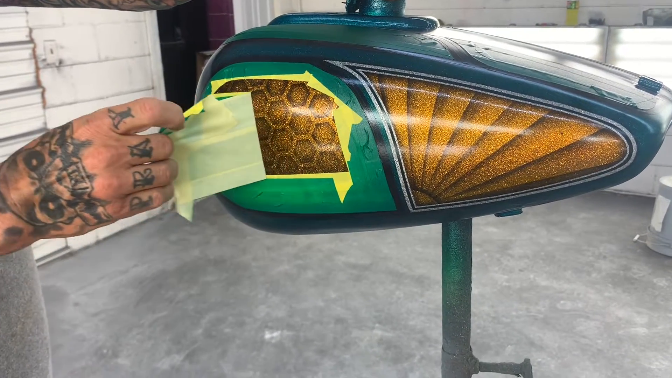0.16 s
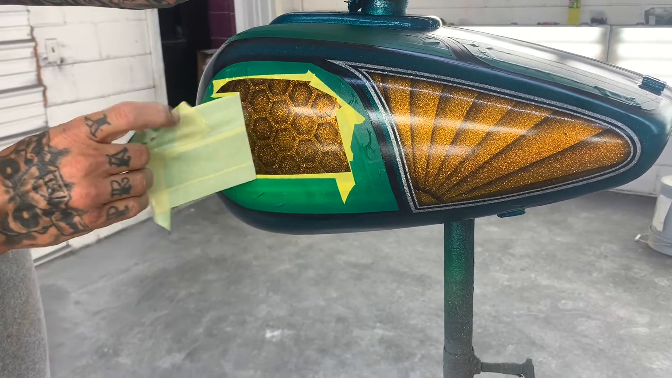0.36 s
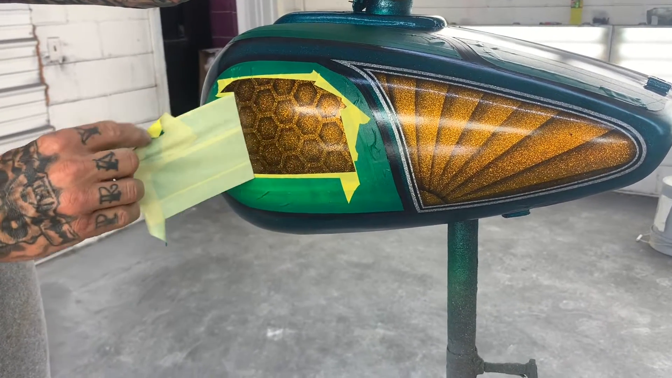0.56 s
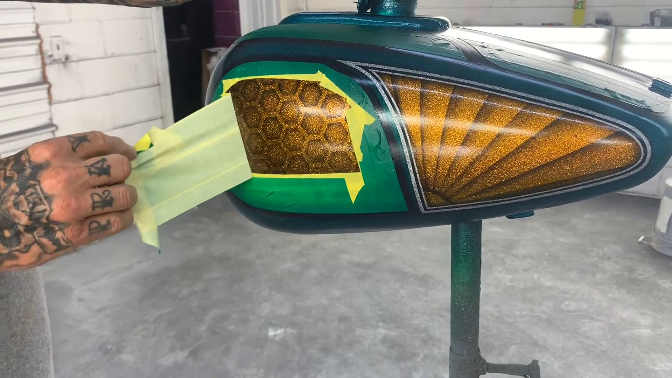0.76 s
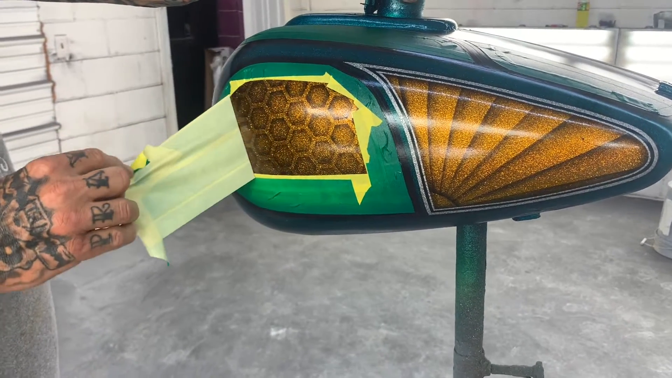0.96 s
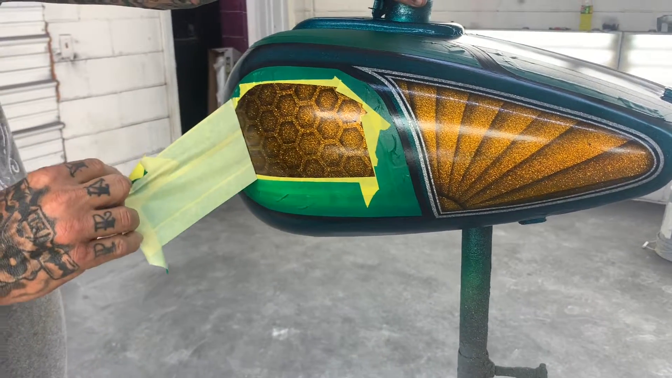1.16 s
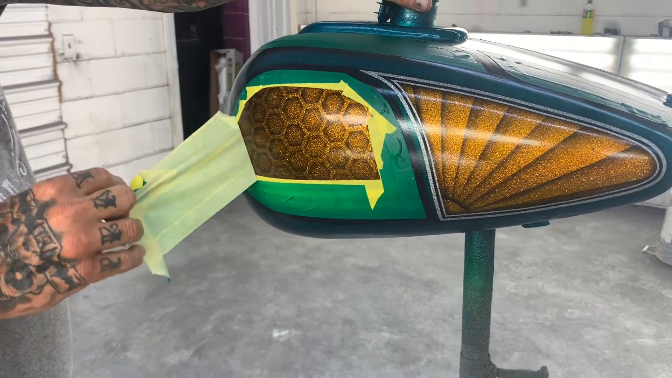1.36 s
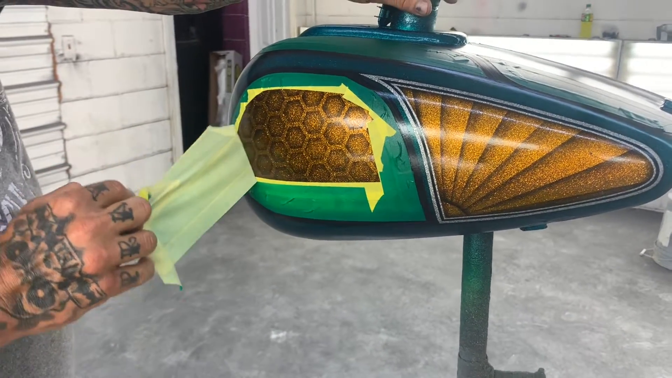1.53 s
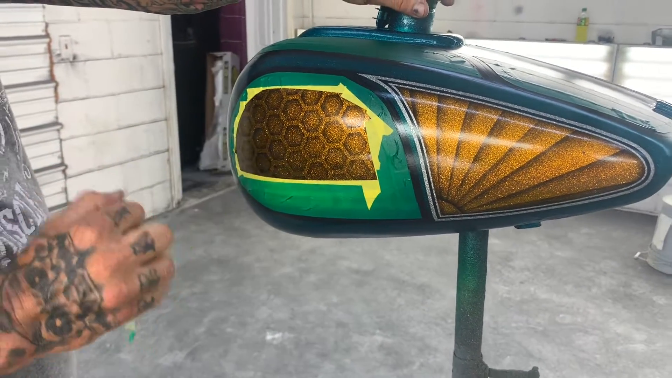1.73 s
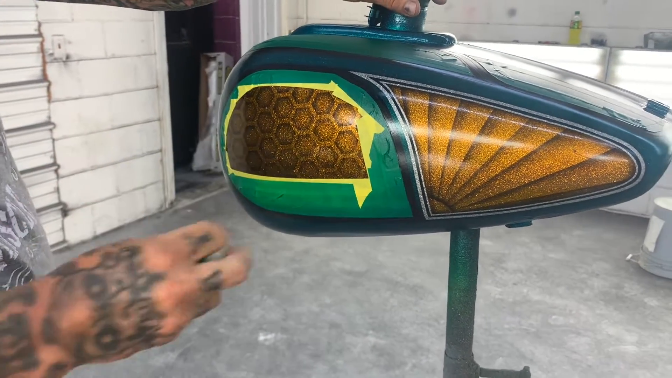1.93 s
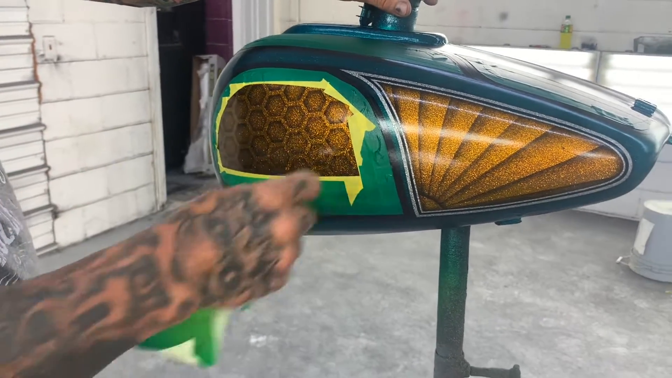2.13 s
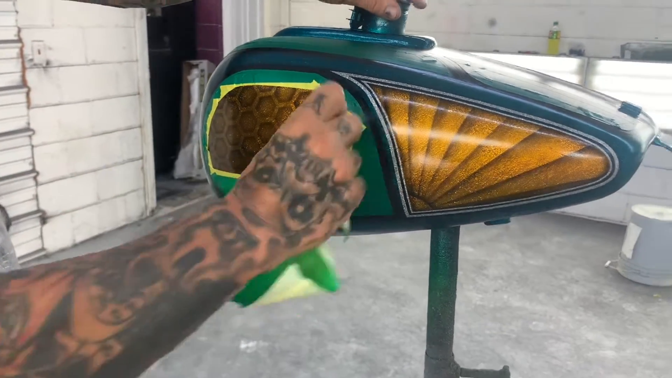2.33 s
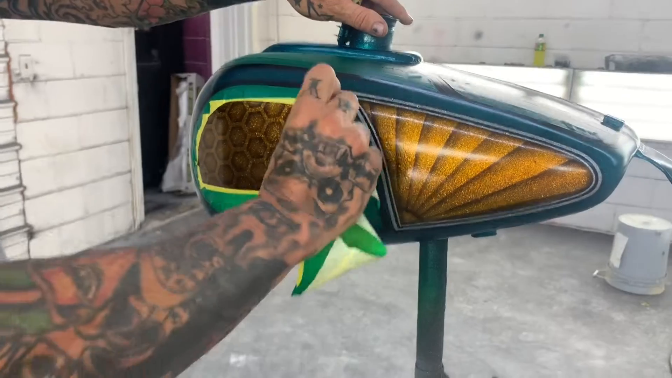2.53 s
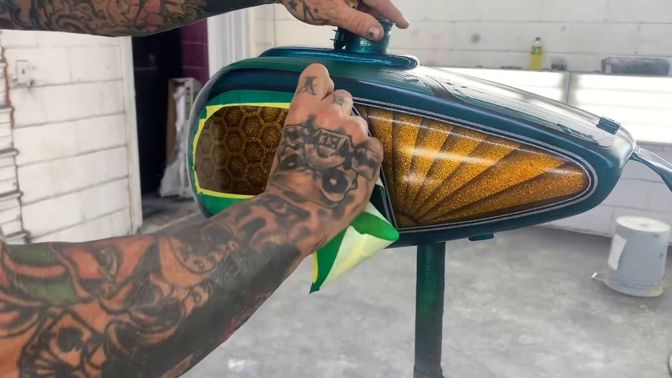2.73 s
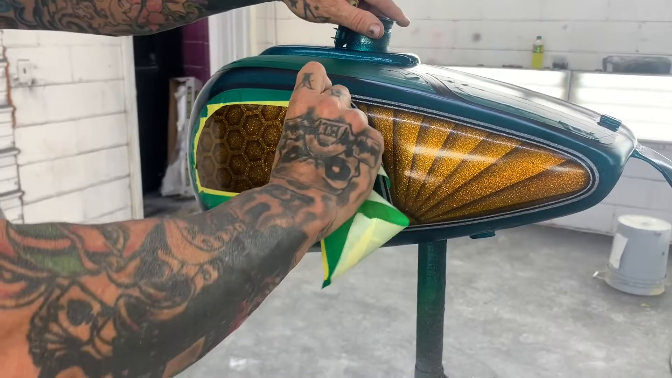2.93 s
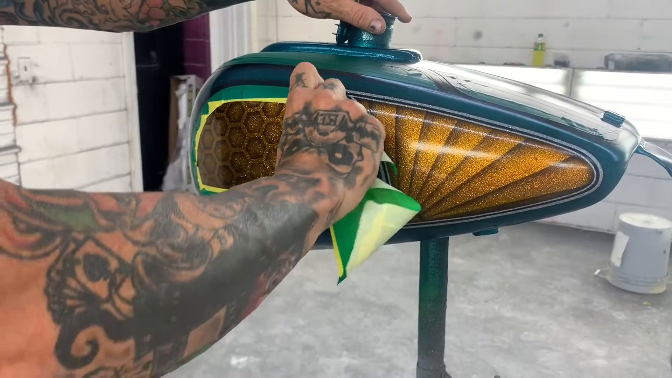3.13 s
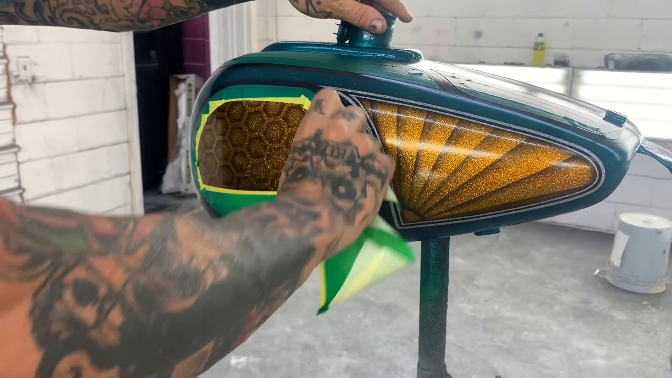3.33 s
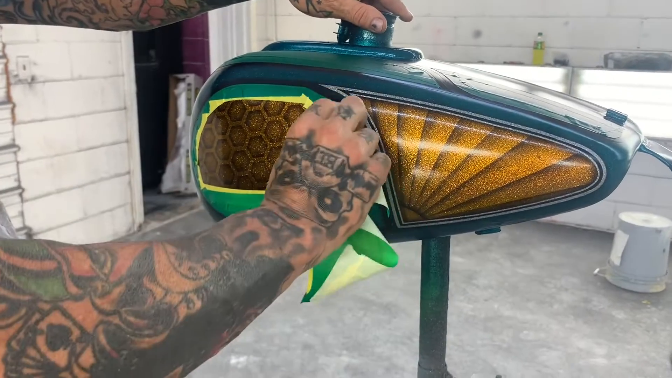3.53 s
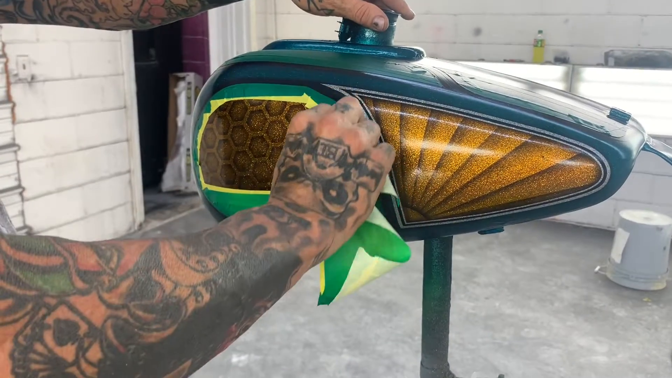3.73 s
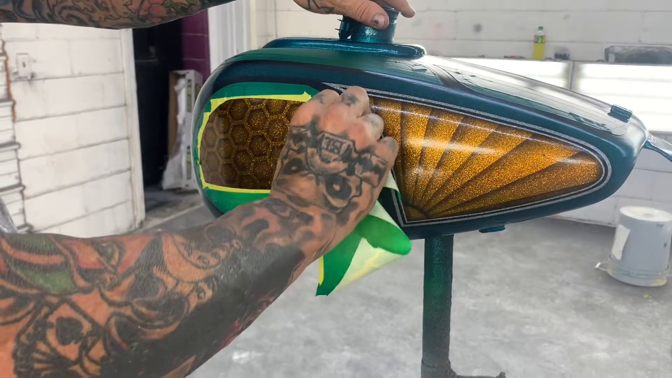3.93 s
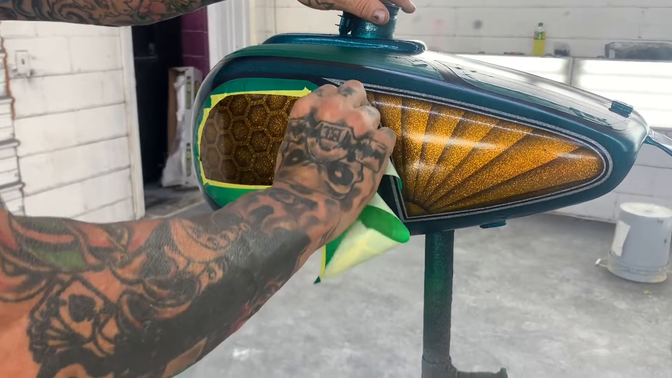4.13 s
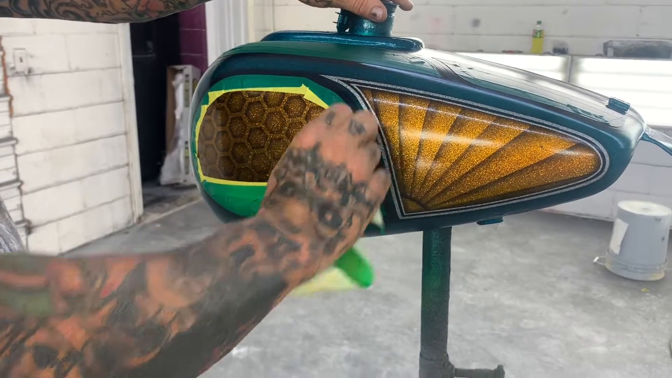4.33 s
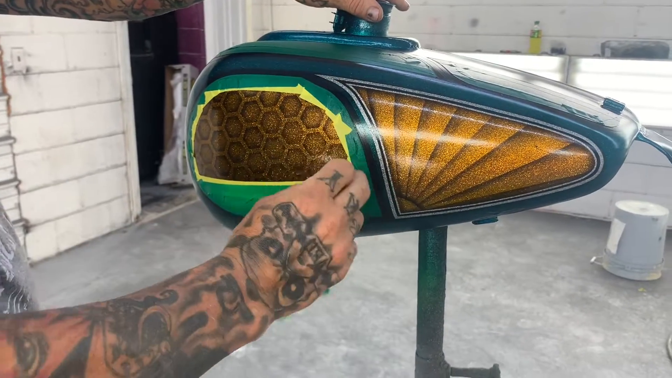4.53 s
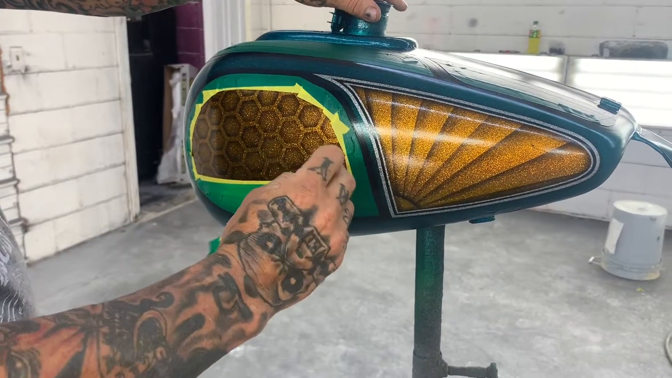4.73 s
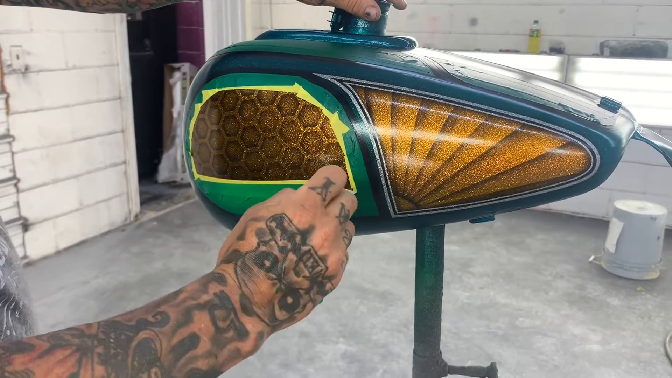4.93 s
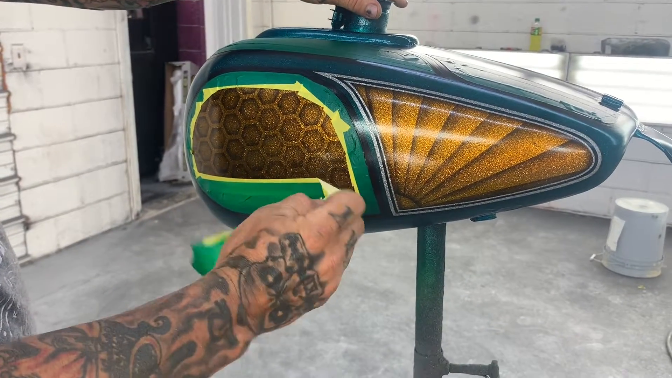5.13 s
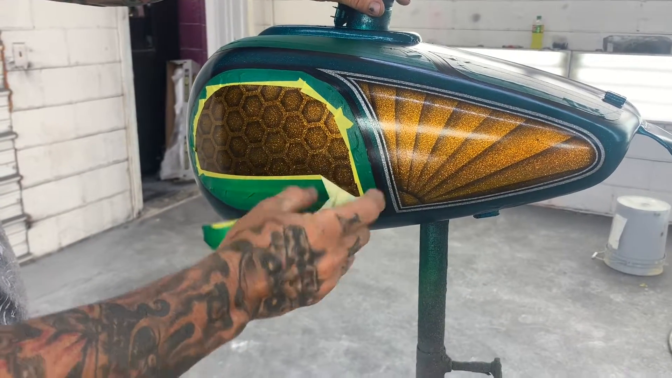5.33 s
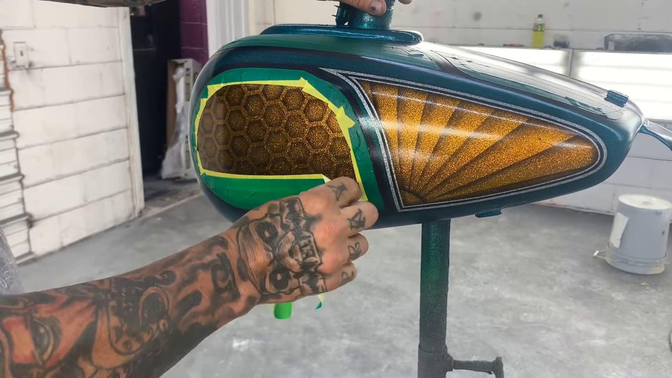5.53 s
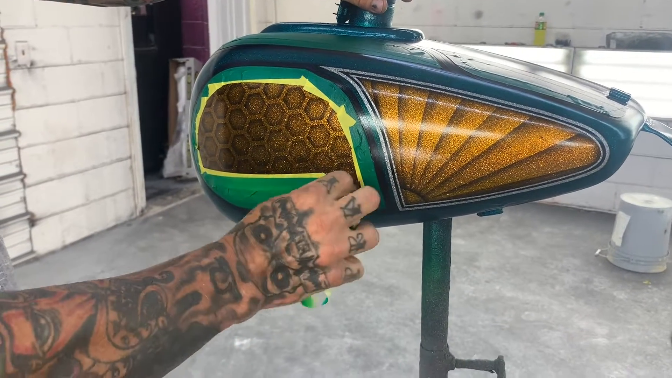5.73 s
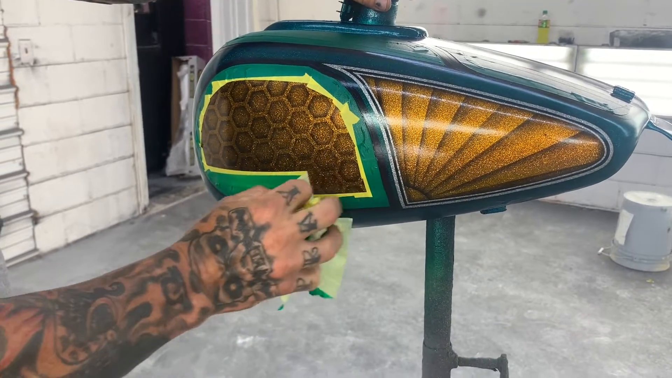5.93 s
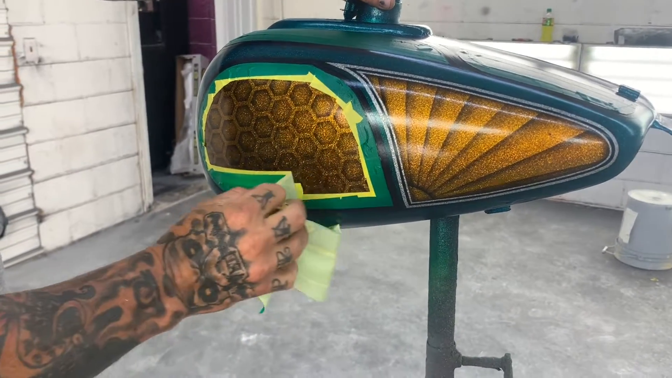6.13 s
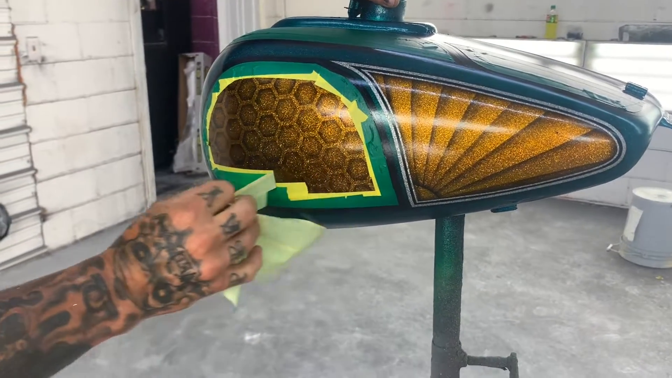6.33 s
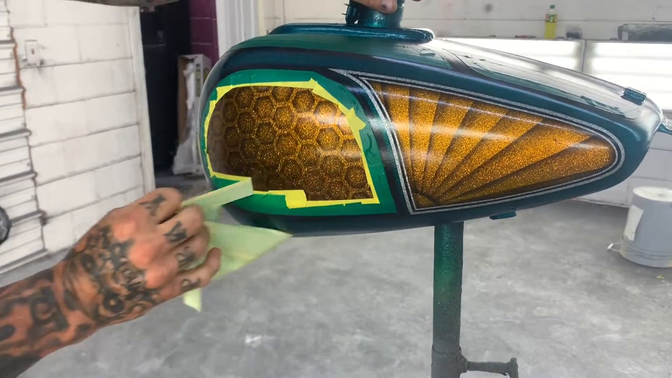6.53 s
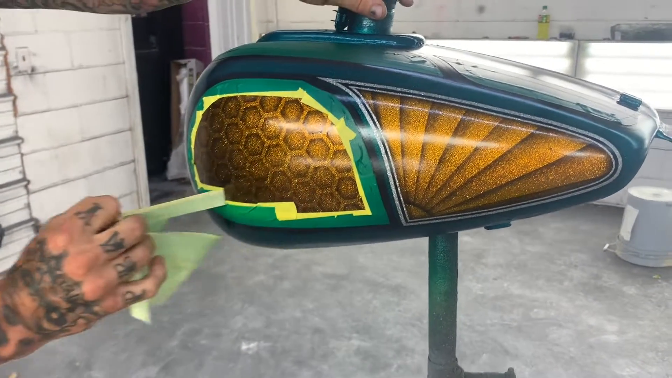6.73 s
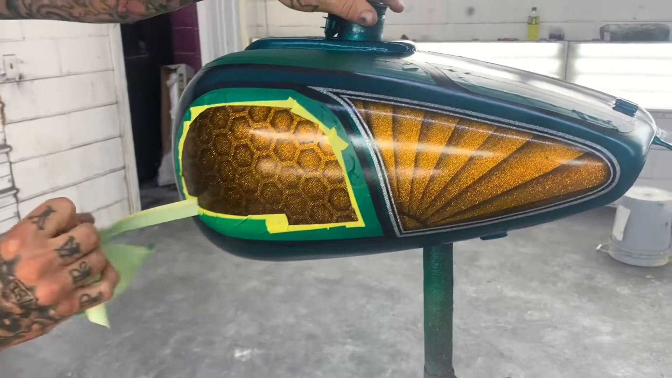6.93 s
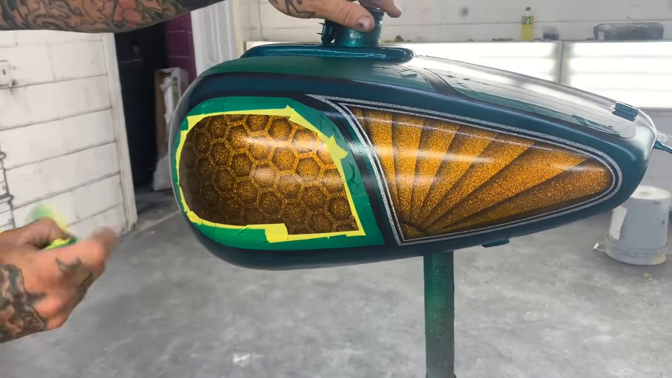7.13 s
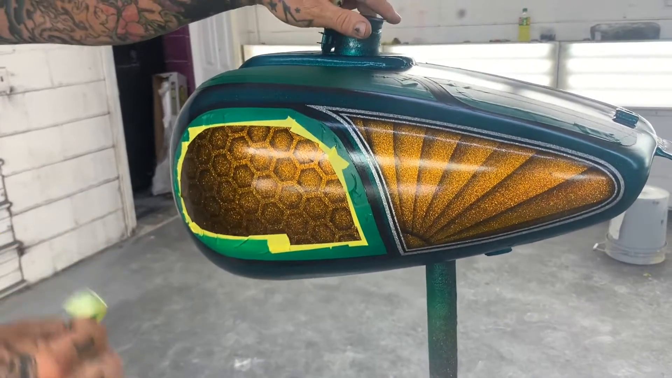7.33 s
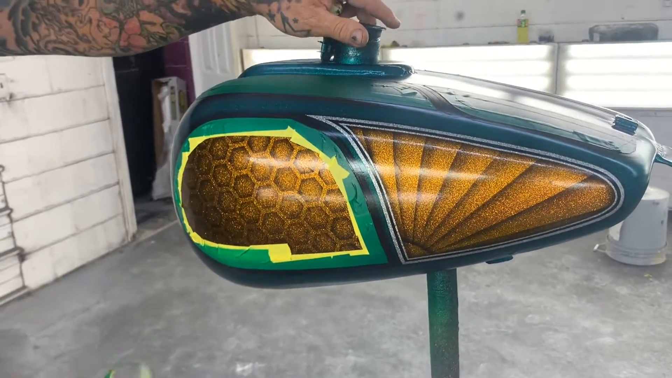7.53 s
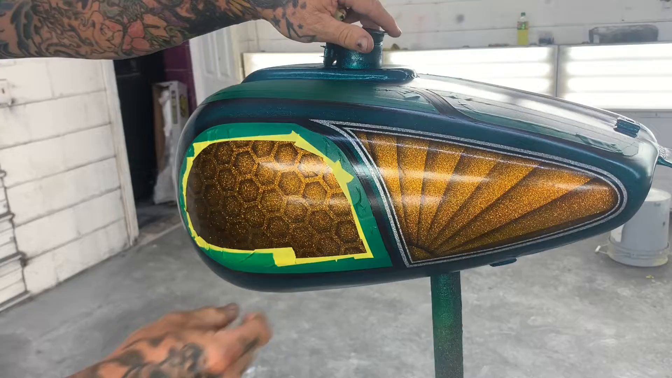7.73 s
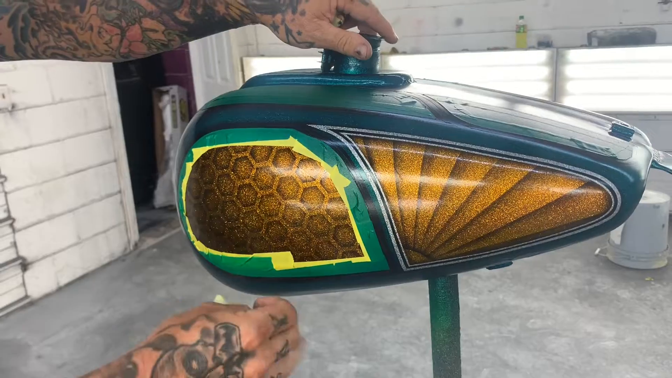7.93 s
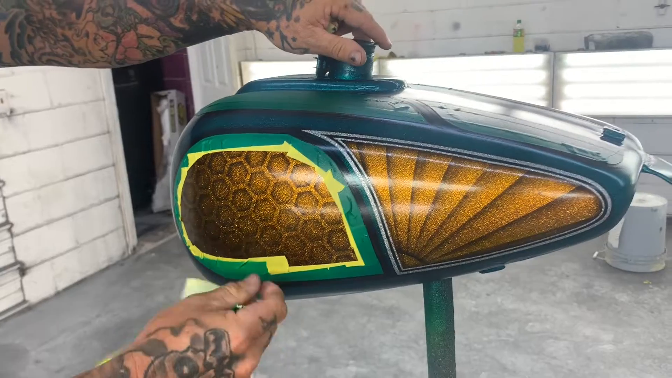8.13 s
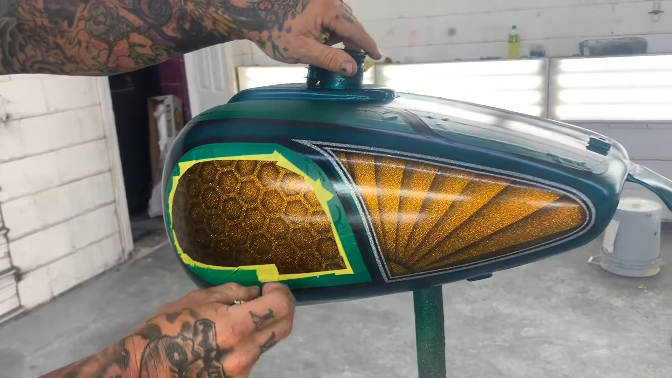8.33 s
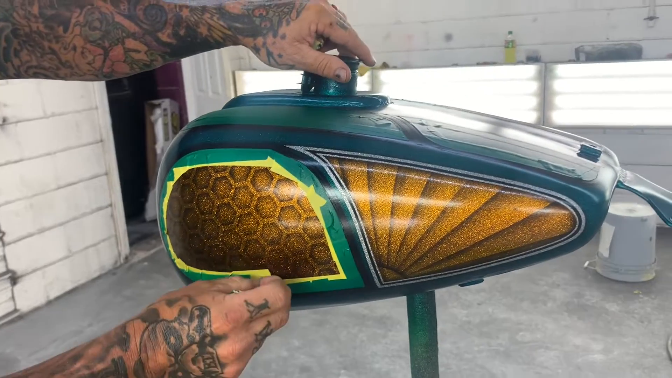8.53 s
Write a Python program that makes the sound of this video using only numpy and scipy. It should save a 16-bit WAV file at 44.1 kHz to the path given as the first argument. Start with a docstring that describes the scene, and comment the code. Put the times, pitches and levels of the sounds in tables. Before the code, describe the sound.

Tape peels in uneven crackling bursts right beside the microphone, then snaps free with a hard tearing crack. Hands quietly rub, pick and bump the hollow tank before shorter, ticking peels resume, one lot of loose tape crumpling late on. The live room adds a short, hard reverberant tail. Behind it sit a steady deep building rumble, soft hiss and an engine beyond the walls, slowing slightly.

```python
"""Masking tape is pulled off a painted steel fuel tank in a workshop, close to a small stereo microphone.
0-2 s: pulls crackle as glue strands snap, the taut strip rings the wall; at 1.7 s the first piece rips free.
2-4 s: quieter; loose tape crumples, fingertips pick at an edge, hands rub and bump the tank.
4-8.6 s: narrow strips peel, tick and ring the wall; loose tape is handled again near 7.4 s.
Throughout: building rumble, hiss and an engine beyond the walls, its throb up from about 4 s as it slows."""
import sys
import numpy as np
from scipy import signal
from scipy.fft import rfft, irfft, next_fast_len
from scipy.io import wavfile
from scipy.ndimage import uniform_filter1d

SR = 44100
rng = np.random.default_rng(int(sys.argv[2]) if len(sys.argv) > 2 else 0)


def dump(signal):
    """Clip the signal to [-1, 1] and save it as 16-bit WAV at the path in sys.argv[1]."""
    limited = np.clip(np.atleast_2d(signal).T, -1, 1)
    pcm = np.round(limited * 32767).astype(np.int16)
    wavfile.write(sys.argv[1], SR, pcm)


N = 378378
TIME = np.arange(N) / SR
SIZE = next_fast_len(N + 2 * SR, True)
HZ = np.fft.rfftfreq(SIZE, 1 / SR)


# pulls on the tape: t/s, attack/s, hold/s, release/s, glue level/dB, paper level/dB, top over lower treble/dB
PULLS = [(0.0, 0.00084, 0.013, 0.38, -31, -34.5, -2), (0.063, 0.075, 0.26, 0.099, -29.5, -36, -5),
         (0.35, 0.039, 0.046, 0.088, -26, -35, -5), (0.493, 0.17, 0.22, 0.16, -32, -42.5, -2.5),
         (0.824, 0.13, 0.31, 0.31, -29.5, -36, -2.5), (1.18, 0.082, 0.06, 0.039, -33, -42, -3),
         (1.389, 0.0064, 0.0092, 0.076, -34.5, -46.5, -5), (1.52, 0.059, 0.0094, 0.029, -29, -36, 2),
         (1.603, 0.0043, 0.1, 0.013, -24, -32.5, 1), (1.878, 0.016, 0.015, 0.067, -38.5, -35, 13),
         (1.987, 0.014, 0.01, 0.024, -29, -29.5, -4), (2.03, 0.021, 0.033, 0.12, -64, -42, -7),
         (2.522, 0.017, 0.013, 0.085, -51.5, -41.5, -15), (3.147, 0.1, 0.032, 0.074, -60, -56.5, -9),
         (3.825, .01, 0.02, 0.088, -48, -52.5, -6), (4.228, 0.13, 0.076, 0.16, -35, -39.5, 0),
         (4.59, 0.065, 0.0066, 0.015, -41.5, -53, 4), (4.756, 0.026, 0.12, 0.036, -40, -42.5, 6.5),
         (4.904, 0.018, 0.21, 0.021, -53, -82, 22), (5.129, 0.013, 0.13, 0.08, -43, -51, 7),
         (5.646, 0.0081, 0.017, 0.18, -47.5, -56, 3), (5.729, 0.082, 0.027, 0.037, -36, -36, 11),
         (5.84, 0.022, 0.025, 0.056, -34, -33.5, 4), (5.949, 0.024, 0.022, 0.35, -39.5, -40, 10.5),
         (6.109, 0.042, 0.348, 0.036, -34, -36.5, -5), (6.398, 0.087, 0.0097, .015, -31, -31, -10),
         (6.484, 0.061, 0.4, 0.021, -34.5, -46.5, -6.5), (6.839, 0.027, 0.028, 0.012, -28.5, -44, -7),
         (6.964, 0.014, 0.013, 0.097, -32, -42.5, -2.5), (7.102, 0.009, 0.017, 0.13, -32.5, -56, -6),
         (7.385, 0.0033, 0.014, 0.055, -24.5, -41, -9.5), (7.566, 0.074, 0.018, 0.049, -41.5, -53, -10),
         (7.781, 0.0086, 0.012, 0.017, -49, -45, 14), (7.849, 0.053, .012, 0.023, -41, -44, 4),
         (7.951, 0.013, 0.014, 0.045, -31, -38.5, -11), (7.987, 0.013, 0.083, 0.21, -45.5, -42, -22),
         (8.336, 0.0043, .012, 0.05, -49.5, -47, -18)]


def pulling():
    """Gains of glue and paper as pulls come and go; the strongest pull dominates the fineness of the snaps."""
    glue_power, paper_power, weighted_fine_db = 1e-12, 0, 0
    for start, attack, hold, release, glue_db, paper_db, fine_db in PULLS:
        force = stroke(start, attack, hold, release)
        power = (from_db(glue_db) * force) ** 2
        glue_power = glue_power + power
        weighted_fine_db = weighted_fine_db + fine_db * power
        paper_power = paper_power + (from_db(paper_db) * force) ** 2
    return np.sqrt(glue_power), np.sqrt(paper_power), weighted_fine_db / glue_power


# spectrum of breaking glue: f/Hz, relative level/dB
GLUE_SPECTRUM = [(500, -18.5), (1500, -20), (2800, -1.5), (3700, 2), (4700, 1.5), (5800, 0), (7000, 4),
                 (10000, 7), (12500, 3.5), (14500, 8.5), (15600, 5.5), (16000, -27)]
# spectrum of the shaken paper, also used by ticks(): f/Hz, relative level/dB
PAPER_SPECTRUM = [(30, -26), (250, -4), (500, -12.5), (750, -13.5), (950, -0.5), (1300, -1), (1700, 1.5),
                  (2500, 4), (3600, 0), (6000, -14), (16000, -17)]
# resonances of the wide first sheet: f/Hz, width/Hz, relative level/dB
SHEET_MODES = [(1640, 970, 5.5), (2090, 1700, -29), (2630, 240, 5), (4470, 290, 1)]
SHEET_OFF_S = 1.74  # narrow strips follow


def peeling(glue_gain, paper_gain, fine_db, glue_db=-0.5, paper_db=-3.0, sheet_db=-24.5):
    """Fine glue strands and a sparser grit of larger snaps break; all of them also shake the paper."""
    wide = TIME < SHEET_OFF_S
    strands = crackle(per_s=5600, spread_db=2.0, clump_db=0.0, clump_rate=330)
    grit_gain = np.where(wide, 0.45, 0.55)
    grit = grit_gain * crackle(per_s=190, spread_db=2.0, clump_db=1.5, clump_rate=30)
    creases = crackle(per_s=1100, spread_db=3.2, clump_db=4.5, clump_rate=130)

    glue = fineness(colour(rms_one(strands + grit), GLUE_SPECTRUM), fine_db)
    shaking = rms_one(creases + 0.93 * strands + 2 * grit)
    sheet = wide * from_db(sheet_db) * ringing(shaking, SHEET_MODES)
    paper = from_db(paper_db) * colour(shaking, PAPER_SPECTRUM)

    # uneven hold of the glue, then stick-slip of the whole peel line
    grip = from_db(1.0 * drift(35) + 0.88 * drift(260))
    return grip * (glue_gain * (from_db(glue_db) * glue + sheet) + paper_gain * paper)


def fineness(x, fine_db, split_hz=6500):
    """Finer snaps move their energy from the lower treble to the top."""
    coarse = signal.sosfiltfilt(signal.butter(2, split_hz, fs=SR, output="sos"), x)
    return coarse * from_db(-fine_db / 2) + (x - coarse) * from_db(fine_db / 2)


# echoes off small surfaces near the strip: mean delay/ms, level/dB
REFLECTIONS = [(0.9, -33), (2.302, -19), (4.702, -6.5)]


def reflections(x, sway=0.09):
    """Tank and arm echo the tape; paths change as the hand moves, so the colour keeps shifting."""
    out = x.copy()
    for delay_ms, db in REFLECTIONS:
        for port in range(2):
            lag = delay_ms / 1000 * SR * (1 + sway * drift(1.5))
            source = np.clip(np.arange(N) - lag, 0, N - 1).astype(int)
            out[port] += from_db(db) * x[port, source]
    return out / np.sqrt(1 + sum(from_db(db) ** 2 for _, db in REFLECTIONS))


# paper snaps or glue patches jump: t/s, crack level/dB, flutter level/dB, low body level/dB
TICKS = [(0.2391, -18, -38, -33), (0.3634, -18, -35, -32), (0.4366, -6, -29, -35), (0.936, -17, -37, -34),
         (1.1176, -14, -32, -34), (1.1507, -15, -32, -46), (1.2274, -16, -31, -39), (1.2408, -8, -28, -39),
         (1.2874, -13, -30, -42), (1.4351, -16, -36, -41), (1.61, -2, -21, -29), (1.6305, -5, -31, -30),
         (1.6695, -9, -29, -34), (1.9065, -8, -25, -36), (1.9449, -8, -28, -50), (1.9534, -13, -32, -38),
         (2.0129, -12, -31, -48), (2.0271, -12, -29, -45), (2.2171, -26, -50, -50), (2.2884, -27, -51, -62),
         (2.3535, -28, -60, -42), (2.5208, -41, -62, -48), (2.6129, -32, -49, -53), (2.9459, -30, -49, -48),
         (3.2165, -32, -52, -50), (3.8398, -13, -36, -50), (4.1053, -31, -50, -50), (4.2353, -31, -51, -63),
         (4.6305, -20, -39, -49), (4.7241, -27, -50, -67), (4.8352, -9, -30, -44), (4.8565, -5, -27, -36),
         (4.862, -14, -36, -40), (4.8824, -13, -38, -48), (4.911, -7, -30, -47), (4.9213, -15, -35, -51),
         (5.0933, -22, -46, -67), (5.1404, -14, -35, -61), (5.1633, -18, -38, -49), (5.2275, -14, -36, -47),
         (5.2677, -33, -42, -49), (5.328, -15, -34, -49), (5.6752, -25, -42, -59), (5.7214, -25, -43, -55),
         (5.7746, -36, -43, -43), (5.7847, -17, -38, -54), (5.8022, -13, -29, -53), (5.8646, -10, -28, -31),
         (5.8885, -8, -28, -38), (5.9807, -16, -34, -44), (5.9986, -12, -30, -39), (6.1314, 4, -22, -30),
         (6.133, -2, -26, -32), (6.1868, -12, -33, -42), (6.3124, -9, -26, -36), (6.4183, -5, -32, -26),
         (6.5007, -7, -28, -37), (6.787, -10, -28, -42), (6.938, -2, -26, -39), (6.9878, -4, -26, -42),
         (7.0655, -16, -32, -49), (7.0782, -8, -33, -51), (7.1162, -19, -31, -48), (7.1382, -12, -29, -26),
         (7.1901, -9, -25, -29), (7.3079, -34, -44, -37), (7.3934, -13, -28, -32), (7.4076, -4, -20, -29),
         (7.4131, -3, -24, -44), (7.4358, -12, -27, -26), (7.6359, -24, -40, -49), (7.7839, -18, -42, -61),
         (7.9039, -19, -42, -56), (7.9613, -11, -30, -39), (7.9658, -9, -31, -41), (7.9777, -20, -31, -34),
         (7.9829, -9, -32, -33), (8.1751, -23, -38, -46), (8.1788, -22, -39, -56), (8.2849, -18, -39, -40),
         (8.352, -23, -42, -38)]
# a whole stretch of glue tears at once: t/s, glue level/dB, paper level/dB, duration scale/ms
RIPS = [(0.406, -27.5, -41, 15), (1.691, -15, -22, 10.7), (1.7267, -4.5, -15, 2.1),
        (1.7301, -6.5, -30, 6.4)]
# spectrum of cracks and flutter: f/Hz, relative level/dB
CRACK_SPECTRUM = [(150, -30), (700, -23), (1500, -16), (3000, -9), (5000, -4), (8000, 0.5), (11000, 2),
                  (14500, 1), (16000, -1.5)]
# spectrum of tearing glue: f/Hz, relative level/dB
RIP_SPECTRUM = [(150, -28), (700, -19), (1500, -12), (3000, -6), (5000, -2.5), (8000, -.5), (11000, 1),
                (14500, .5), (16000, -1.5)]


def ticks(fine_db, crack_db=1.0, flutter_db=5.5, body_db=6.5, rip_db=6.0):
    """Each tick is a sharp crack in a short flutter of noise, with a low paper body; rips hold, then drop."""
    rise_s, flutter_s, body_s = 0.0011, 0.00192, 0.0026
    cracks = clicks([(s, db + crack_db) for s, db, _, _ in TICKS])
    flutters = bursts([(s - rise_s, db + flutter_db, flutter_s) for s, _, db, _ in TICKS], swelling)
    bodies = bursts([(s - rise_s / 2, db + body_db, body_s) for s, _, _, db in TICKS], dying)
    rips = bursts([(s, db + rip_db, ms / 1000) for s, db, _, ms in RIPS], tearing)
    flaps = bursts([(s, db, ms / 1000) for s, _, db, ms in RIPS], tearing)

    snaps = fineness(colour(cracks + flutters, CRACK_SPECTRUM), fine_db / 2)
    torn_glue = fineness(colour(rips, RIP_SPECTRUM), fine_db)
    return snaps + torn_glue + lighten(colour(bodies + flaps, PAPER_SPECTRUM))


def tearing(age):
    """The force builds quickly, holds, and drops when the glue has gone."""
    return np.minimum(age * 4, 1) / (1 + age ** 8)


def swelling(age):
    """A quick rise to a peak, then a decay with a weak longer tail."""
    return 2 * age * np.exp(1 - 2 * age) + 0.22 * np.minimum(age, 1) * dying(age / 5)


# taut strip drives the wall: t/s, attack plus hold/s, level/dB
TAUT = [(0.03, 0.53, -45), (3.82, .05, -49.5), (4.28, 0.15, -37.5), (4.58, 0.051, -51.5),
        (4.76, 0.096, -40.5), (5.09, 0.053, -57), (5.76, 0.16, -39.5), (6.0, 0.23, -50)]
# modes of the tank wall: f/Hz, width/Hz, relative level/dB
WALL_MODES = [(898, 48, 0), (950, 170, -3), (1068, 60, -9), (1320, 80, -13), (1450, 700, -6),
              (1615, 70, -12), (1703, 50, -11), (1995, 70, -12)]


def tank_wall(wall_db=-3.0):
    """The taut strip passes its snaps into the steel, which rings as strongly as it is pulled."""
    ring = ringing(crackle(per_s=5000, spread_db=7.0, clump_db=3.0, clump_rate=160), WALL_MODES)
    local_power = uniform_filter1d(np.mean(ring ** 2, axis=0), size=2600)
    even = ring / np.sqrt(local_power + 1e-6)
    return from_db(wall_db) * strokes(TAUT, attack=0.084, release=0.059) * even


# loose tape is grabbed, crumpled and dropped: t/s, attack plus hold/s, level/dB, central resonance f/Hz
CRUMPLES = [(2.54, 0.075, -49.5, 2060), (3.243, 0.039, -52.5, 1038), (7.15, 0.062, -37, 2120),
            (7.39, 0.025, -34, 2300), (7.477, 0.046, -48.5, 1860)]


def loose_strip(crumple_db=-4.0, width_share=0.6):
    """Folds snap in slack tape; its broad resonance differs per handful and wanders as the tape curls."""
    curl, curls_per_s = 1.2, 14
    snaps = crackle(per_s=1400, spread_db=2.0, clump_db=0.5, clump_rate=140)
    bend = np.pi / 4 * (1 + np.tanh(drift(curls_per_s)))
    out = 0
    for s, length, db, hz in CRUMPLES:
        slack = ringing(snaps, [(hz / curl, width_share * hz, 0)])
        tight = ringing(snaps, [(hz * curl, width_share * hz, 0)])
        folds = rms_one(np.cos(bend) * slack + np.sin(bend) * tight)
        out = out + strokes([(s, length, db + crumple_db)], attack=0.009, release=0.16) * folds
    return out


def lighten(x, light_hz=858):
    """Loose paper is too light to radiate much bass."""
    return signal.sosfilt(signal.butter(3, light_hz, "high", fs=SR, output="sos"), x)


# fingertips pick at a tape edge: t/s, peak level/dB, f/Hz
PICKS = [(1.872, -23.5, 1570), (2.349, -39, 1180), (2.943, -40.5, 1950), (3.215, -42, 1800),
         (3.319, -39, 1820), (3.381, -44, 2020), (3.528, -44, 1870), (4.102, -41, 1990),
         (7.981, -27.5, 2500)]


def picking(length_s=0.0042, width_hz=750):
    """A fingertip slips off a short edge of tape, giving a brief resonant chirp."""
    out = np.zeros(N)
    for s, db, hz in PICKS:
        push = bursts([(s, 0, length_s)], swelling) + 1e-18
        flick = ringing(push, [(hz, width_hz, 0)])
        out += from_db(db) * flick / np.abs(flick).max()
    return out


# a hand shifts on the tank: t/s, attack plus hold/s, arm drag level/dB, fingertip scrub level/dB
RUBS = [(0.12, 0.26, -49, -47.5), (0.34, 0.063, -50, -43.5), (1.0, 0.19, -47.5, -44),
        (1.62, 0.032, -44.5, -70), (1.9, 0.23, -56, -46.5), (2.2, 0.6, -54, -57.5),
        (2.85, 0.38, -51.5, -53), (3.8, 0.29, -52.5, -49.5), (4.1, 0.43, -56, -71.5),
        (5.26, 0.36, -81, -51.5), (5.92, 0.39, -54.5, -47.5), (6.4, 0.53, -54, -48.5),
        (6.78, 0.29, -54, -47.5), (7.25, 0.3, -78, -54.5), (7.95, 0.57, -55, -63)]
# dull bumps on the tank: t/s, thud level/dB, knuckle knock level/dB, decay/s
BUMPS = [(0.398, -30, -49, 0.032), (1.058, -34, -44, 0.11), (1.696, -23, -49, 0.0095),
         (2.354, -27, -54, 0.0075), (2.523, -29, -39, 0.0057), (3.801, -28.5, -44.5, 0.0086),
         (3.847, -31.5, -34.5, 0.0085), (6.079, -33, -45, 0.0082), (6.346, -26, -30, 0.006),
         (7.979, -41.5, -40.5, 0.076)]
# spectrum of skin on the hollow tank: f/Hz, relative level/dB
HAND_SPECTRUM = [(15, -65), (40, -17.5), (80, -17.5), (140, 8), (200, 3.5), (280, 3.5), (400, 1),
                 (600, -15), (1300, -31.5), (4000, -55)]
# spectrum of fingertips and knuckles: f/Hz, relative level/dB
FINGER_SPECTRUM = [(20, -58), (200, -23), (340, -7), (440, 2.5), (620, -2.5), (800, -7.5), (1300, -13),
                   (4000, -26.5)]
# spectrum of the bumped tank: f/Hz, relative level/dB
TANK_SPECTRUM = [(15, -35), (40, -11), (80, -2), (140, 3.5), (205, 2), (320, -6.5), (480, -12.5),
                 (680, -23.5), (950, -29), (4000, -61.5)]


def hands(rub_db=2.5, scrub_db=-4.5, resting_db=-74):
    """Skin drags over the hollow tank, fingertips scrub at the tape, and the tank is bumped."""
    drag_gain, scrub_gain = strokes(RUBS, attack=0.029, release=0.19)
    drag_gain = np.hypot(drag_gain, from_db(resting_db))  # the other hand steadies the tank throughout
    drag = crackle(per_s=1500, spread_db=2.0, clump_db=1.5, clump_rate=50)
    thuds = bursts([(s, db, decay) for s, db, _, decay in BUMPS], dying)
    knocks = bursts([(s, db, decay) for s, _, db, decay in BUMPS], dying)

    arm = drag_gain * from_db(rub_db) * colour(drag, HAND_SPECTRUM)
    fingers = colour(scrub_gain * from_db(scrub_db) * drag + knocks, FINGER_SPECTRUM)
    return arm + fingers + colour(thuds, TANK_SPECTRUM)


# the engine slows a little: t/s, rate/(cycles per s)
ENGINE_SPEED = [(0, 19.95), (3.3, 19.9), (5.4, 19.65), (7.6, 19.2), (8.58, 18.75)]
# engine level: t/s, throb level/dB, drone level/dB
ENGINE_LEVEL = [(0, -82, -56), (1.4, -88, -49.5), (3.6, -62, -44.5), (4.25, -45.5, -50.5),
                (5.05, -54.5, -58), (5.25, -41.5, -42.5), (5.6, -42, -41.5), (5.8, -49, -52),
                (6.3, -40.5, -42), (7.05, -42.5, -46), (7.7, -51.5, -51.5), (8.58, -71, -50)]
# partials: multiple of the cycle rate, mid level/dB, side level/dB
ENGINE_ORDERS = [(3, -15, -50), (4, -3, -51), (5, -12.5, -58), (6, -3, -47), (7, -9, -47), (8, -5.5, -32),
                 (9, -3, -18), (10, -13.5, -31), (11, -2, -22.5), (12, -25, -16.5), (13, -28, -8),
                 (14, -26, -16.5), (15, -52.5, -29), (16, -52, -30), (17, -50.5, -16.5), (19, -48.5, -12.5),
                 (20, -29, -20), (22, -18.5, -26.5)]
DRONE_ORDER = 11  # this partial and its octave make the drone


def engine(second_firing=0.45, waver_db=2.5, smear=0.0701):
    """Partials phased as two uneven firings a cycle; walls pass only low ones and smear each beat."""
    (cycles_per_s,), (throb_db, drone_db) = in_time(ENGINE_SPEED), in_time(ENGINE_LEVEL)
    turn = 2 * np.pi * np.cumsum(cycles_per_s) / SR
    out = np.zeros((2, N))
    for order, mid_db, side_db in ENGINE_ORDERS:
        firing_phase = np.angle(1 + np.exp(-2j * np.pi * order * second_firing))
        phase = order * turn + firing_phase + smear * order ** 2
        level_db = throb_db if order % DRONE_ORDER else drone_db
        gain = np.sqrt(2) * from_db(level_db + waver_db * drift(8.3))
        mid, side = from_db(mid_db) * np.cos(phase), from_db(side_db) * np.sin(phase)
        out += gain * np.array([mid + side, mid - side])
    return out


# rumble over time: t/s, level/dB
RUMBLE_LEVEL = [(0, -49.5), (1.7, -43), (2.6, -45.5), (3.5, -43.5), (5, -47.5), (7.3, -45), (8.58, -43)]
# spectrum of the rumble: f/Hz, relative level/dB
RUMBLE_SPECTRUM = [(20, -30), (45, -10), (80, 6), (120, -1.5), (200, -5), (310, -21), (440, -19.5),
                   (650, -25), (1500, -36.5)]
# spectrum of the hiss: f/Hz, relative level/dB
AIR_SPECTRUM = [(200, -4.5), (700, -0.5), (1400, -11), (2000, -32), (3200, 0.5), (5500, 10), (8000, 0),
                (11000, -3.5), (14000, 9), (16000, -12)]


def background(waver_db=0.5, air_db=-57.0):
    """Low rumble of the building and a faint steady hiss, both filtered noise."""
    rumble_gain = from_db(in_time(RUMBLE_LEVEL)[0] + waver_db * drift(11.0))
    rumble = rumble_gain * colour(rng.standard_normal((2, N)), RUMBLE_SPECTRUM)
    return rumble + from_db(air_db) * colour(rng.standard_normal((2, N)), AIR_SPECTRUM)


# reverberation: f/Hz, time to fall 60 dB/s
ROOM_T60 = [(100, 5.3), (1000, 1.5), (4000, 1.42), (9000, 1.07), (16000, 0.47)]


def workshop(x, tail_db=-11.0):
    """Scatter from things close by, then a hard-walled tail that dies sooner in the treble."""
    age = TIME[:3 * SR // 2]
    white = rng.standard_normal((2, len(age)))
    edges, tail = np.geomspace(60, 17000, 10), 0
    for low, high in zip(edges, edges[1:]):
        band_filter = signal.butter(2, [low, high], "band", fs=SR, output="sos")
        band = signal.sosfilt(band_filter, rng.permutation(white, axis=1))
        t60_s = at_hz(ROOM_T60, np.sqrt(low * high))[0]
        tail = tail + band * from_db(-60 * age / t60_s)
    response = from_db(tail_db) * rms_one(tail * (age > 0.007)) / np.sqrt(len(age))
    return x + scatter(x) + signal.fftconvolve(x, response, axes=1)[:, :N]


def scatter(x, early_db=-5.0, early_s=0.007, count=5, turns_per_s=9):
    """Things close by scatter the sound; hand and strip move, so one set of paths gives way to another."""
    age, out = TIME[:SR // 20], 0
    shares = np.array([drift(turns_per_s) for _ in range(count)])
    for share in shares / np.sqrt(np.sum(shares ** 2, axis=0)):
        echoes = rng.standard_normal((2, len(age))) * dying(age / early_s)
        paths = rms_one(echoes) / np.sqrt(len(age))
        out = out + share * signal.oaconvolve(x, paths, axes=1)[:, :N]
    return from_db(early_db) * out


# microphone pair: f/Hz, left-right difference gain/dB, left minus right level/dB
PORTS = [(30, -28.5, 3), (130, -11.5, -1), (273, -10, 0), (610, 1.5, -3), (1540, 0, -3.5),
         (2905, -0.5, -3.5), (5810, -1, -10), (6640, 1.5, -2.5), (7700, -27, 0), (16000, -15, -0.5)]
# phase by which the left port leads: f/Hz, phase/rad
PORT_PHASE = [(0, 0), (300, 0), (600, .7), (1000, 1.1), (2000, 1.6), (3200, 3), (4400, 5.4), (6500, 5.9),
              (8600, 3.14), (11000, 0), (15800, -6.28)]


def microphone(x):
    """Two ports: alike in the bass and top treble, apart in between, with a frequency-dependent phase lag."""
    width_db, balance_db = at_hz(PORTS, HZ)
    left, right = rfft(x, SIZE)
    mid, side = (left + right) / 2, from_db(width_db) * (left - right) / 2
    lean = from_db(balance_db / 2)
    lag = np.exp(-1j * np.interp(HZ, *np.transpose(PORT_PHASE)))
    pair = np.array([(mid + side) * lean, (mid - side) / lean * lag])
    return irfft(pair / np.sqrt((lean ** 2 + lean ** -2) / 2), SIZE)[:, :N]


def crackle(per_s, spread_db, clump_db, clump_rate, scatter=0.4):
    """Tiny snaps of uneven size and aim; the peel line sticks and slips, so they come in clumps."""
    sizes = from_db(spread_db * np.minimum(rng.exponential(1, N), 4)) * rng.choice([-1, 1], N)
    struck = rng.random(N) < per_s / SR
    snaps = sizes * struck * from_db(clump_db * drift(clump_rate))
    aim = scatter * 2 * rng.uniform(-0.69, 1, N)
    return rms_one(snaps * (1 + aim * [[1], [-1]]))


def clicks(events):
    """One impulse for each (t/s, level/dB)."""
    out = np.zeros(N)
    for s, db in events:
        out[int(s * SR)] += from_db(db)
    return out


def bursts(events, envelope):
    """A rush of noise for each (t/s, level/dB, length/s), shaped by envelope(age / length)."""
    out, age = np.zeros(N + SR), np.arange(SR // 2) / SR
    for s, db, length in events:
        noise = np.tanh(rng.standard_normal(len(age)))
        start = int(s * SR)
        out[start:start + len(age)] += from_db(db) * noise * envelope(age / max(length, 1e-4))
    return out[:N]


def dying(age):
    """Instant attack, exponential decay."""
    return np.exp(-age)


def stroke(start, attack, hold, release):
    """A hand movement: the force builds, holds, then dies away."""
    force = np.zeros(N)
    during = (TIME > start) & (TIME < start + attack + hold + 10 * release)
    age = TIME[during] - start
    decay = np.exp(-np.maximum(age - attack - hold, 0) / release)
    force[during] = np.minimum(age / attack, 1) * decay
    return force


def strokes(rows, attack, release):
    """Power-summed gain of movements (t/s, length/s, level/dB, ..), one gain per level column."""
    power = 0
    for start, length, *dbs in rows:
        force = stroke(start, attack, length - attack, release)
        power = power + (from_db(dbs)[:, None] * force) ** 2
    return np.sqrt(power)


def ringing(snaps, modes):
    """Snaps through double resonances (f/Hz, width/Hz, level/dB), scaled to unit rms."""
    out = 0
    for hz, width, db in modes:
        mode = resonate(resonate(snaps, hz, width), hz, width)
        out = out + from_db(db) * rms_one(mode)
    return rms_one(out)


def resonate(x, hz, width_hz):
    """One two-pole resonance with gain about 1 on top."""
    r = np.exp(-np.pi * width_hz / SR)
    zeros = np.array([1, 0, -1]) * (1 - r * r) / 2
    poles = [1, -2 * r * np.cos(2 * np.pi * hz / SR), r * r]
    return signal.lfilter(zeros, poles, x)


def colour(x, spectrum):
    """Causal minimum-phase filter that keeps the power of white noise."""
    gain = rms_one(from_db(at_hz(spectrum, HZ)[0]))
    cepstrum = irfft(np.log(gain), SIZE)
    cepstrum[1:SIZE // 2] *= 2  # fold onto positive time
    cepstrum[SIZE // 2 + 1:] = 0
    return irfft(rfft(x, SIZE) * np.exp(rfft(cepstrum)), SIZE)[..., :N]


def drift(rate):
    """Bounded random ramps with unit rms, `rate` new targets a second."""
    return rms_one(np.interp(TIME * rate, np.arange(N), rng.uniform(-1, 1, N)))


def in_time(rows):
    """Each column of a curve at every sample."""
    s, *columns = np.transpose(rows)
    return [np.interp(TIME, s, c) for c in columns]


def at_hz(rows, hz):
    """Each column of a spectrum, read on a log-frequency axis."""
    points, *columns = np.transpose(rows)
    return [np.interp(np.log(hz + 1), np.log(points), c) for c in columns]


def from_db(db):
    """Decibels to gain."""
    return 10 ** (np.asarray(db) / 20)


def rms_one(x):
    """Scale to unit rms."""
    return x / np.sqrt(np.mean(x ** 2) + 1e-20)


def scene():
    """Tape and hands in the room, over the background and the engine."""
    glue_gain, paper_gain, fine_db = pulling()
    tape = reflections(peeling(glue_gain, paper_gain, fine_db) + lighten(loose_strip()))
    near = tape + ticks(fine_db) + tank_wall() + picking() + hands()
    return microphone(workshop(near) + background()) + engine()


def record(dry, cutoff_hz=16000):
    """Peaks beyond full scale clip; a steep low-pass cuts the top."""
    low_pass = signal.ellip(10, 0.2, 80, cutoff_hz, fs=SR, output="sos")
    return signal.sosfilt(low_pass, np.clip(dry, -1, 1))


dry = scene()
out = record(dry)
dump(out)
```